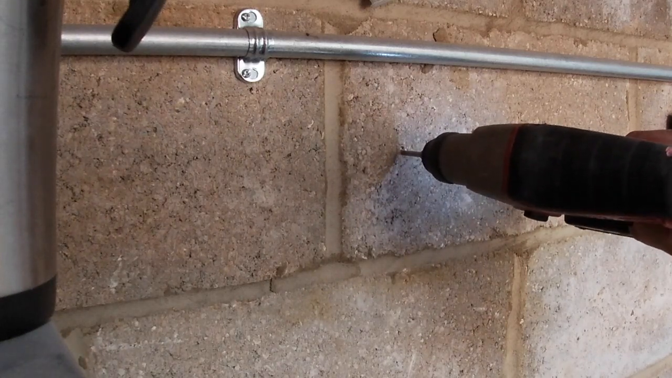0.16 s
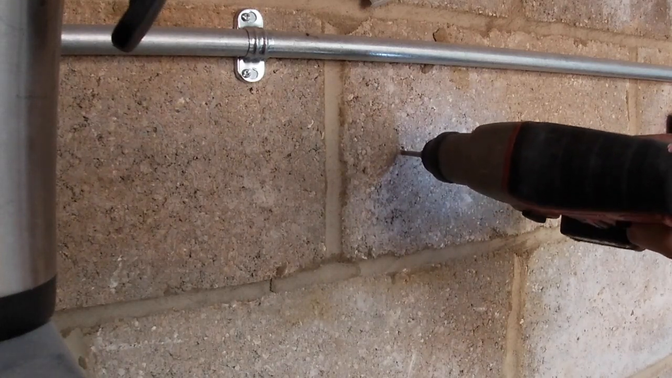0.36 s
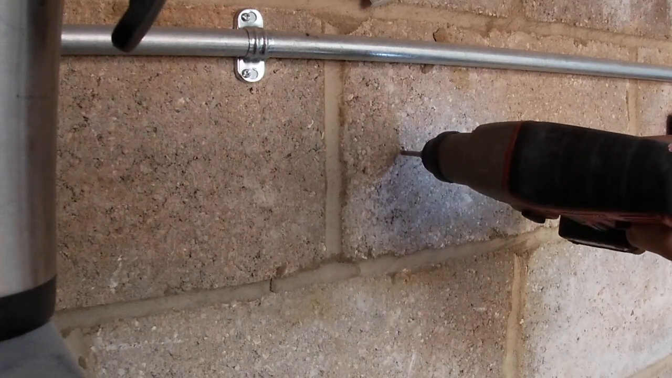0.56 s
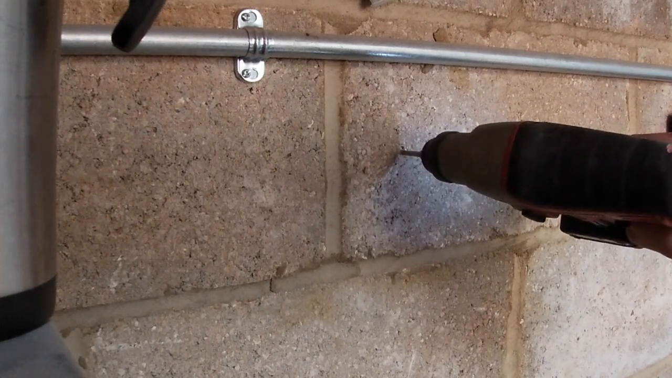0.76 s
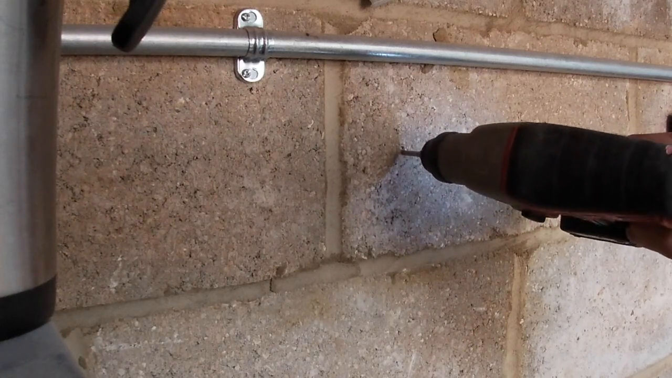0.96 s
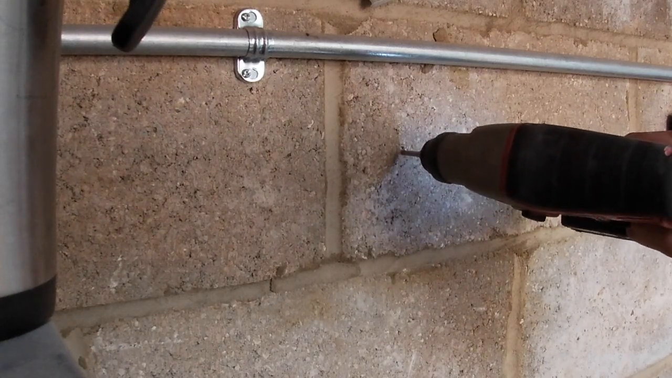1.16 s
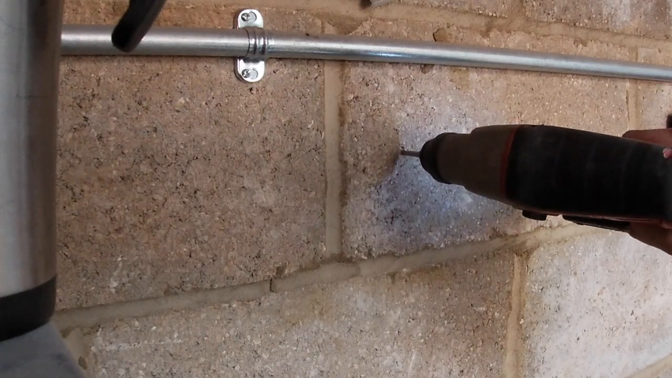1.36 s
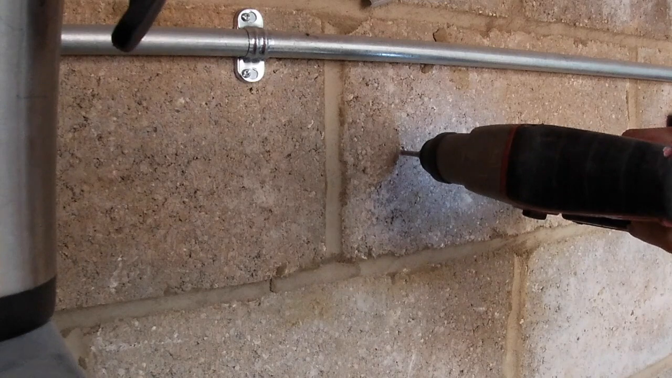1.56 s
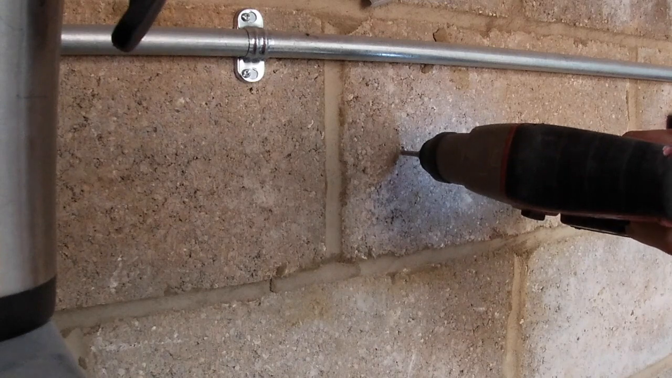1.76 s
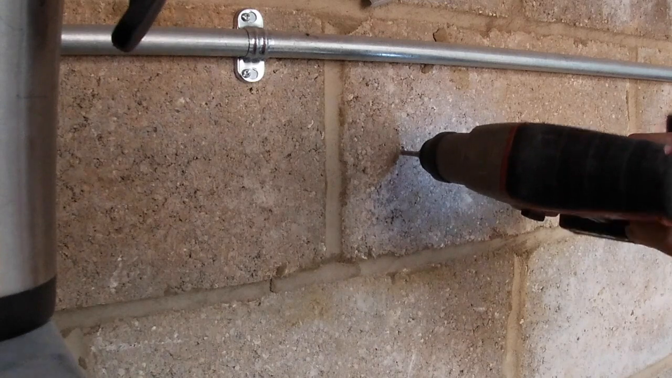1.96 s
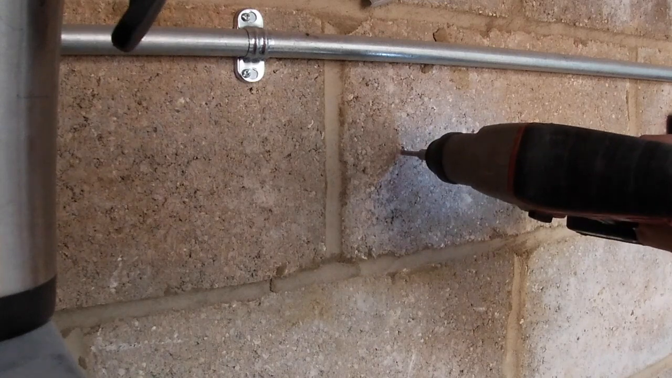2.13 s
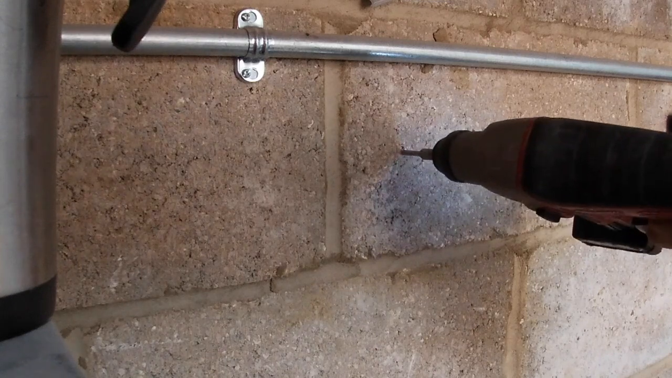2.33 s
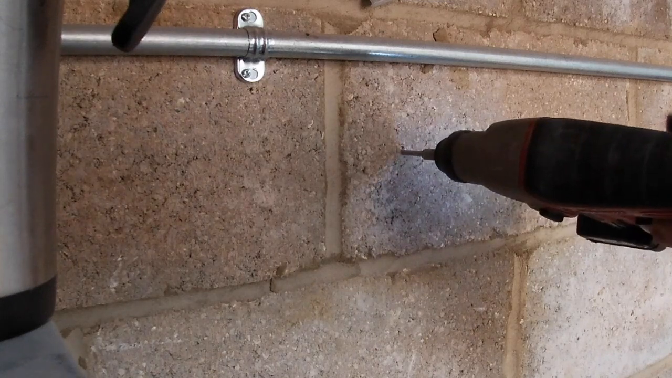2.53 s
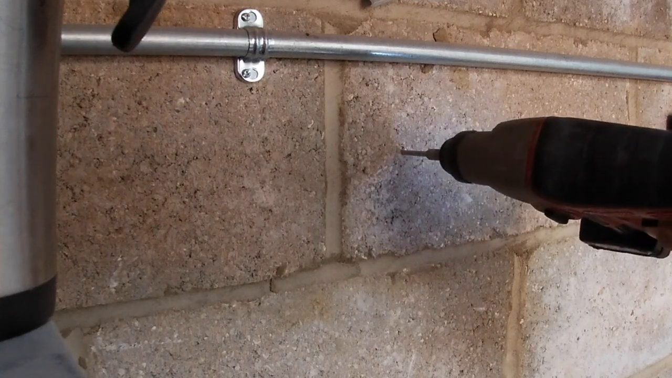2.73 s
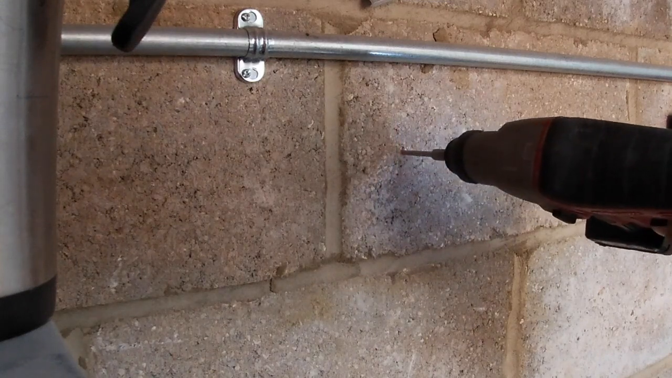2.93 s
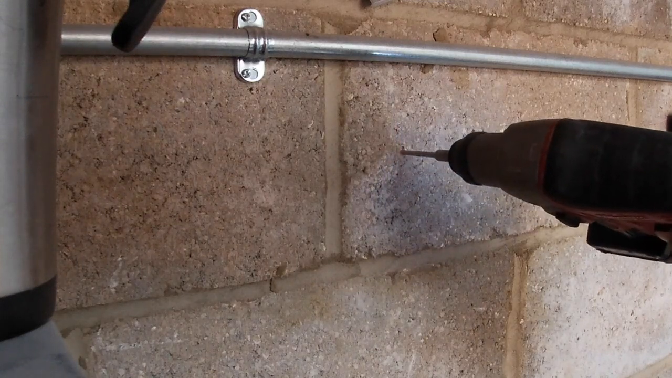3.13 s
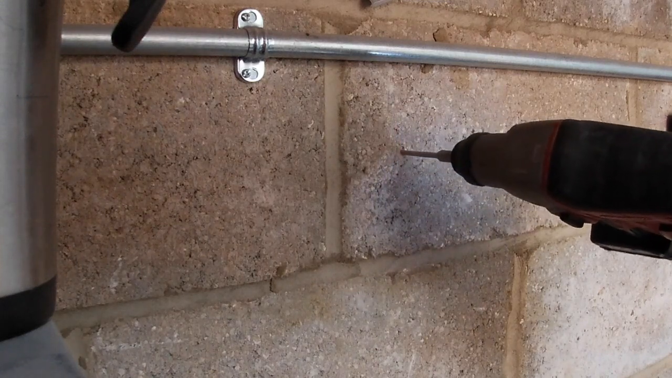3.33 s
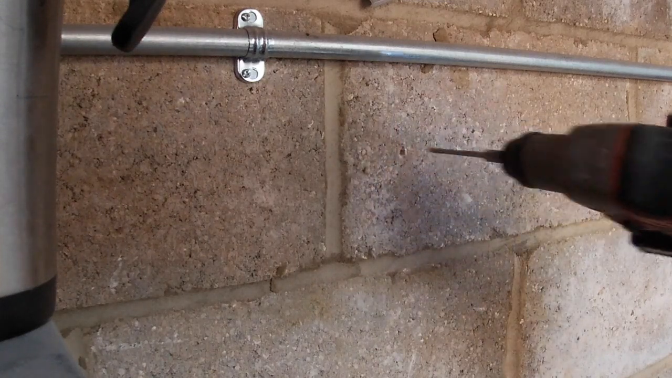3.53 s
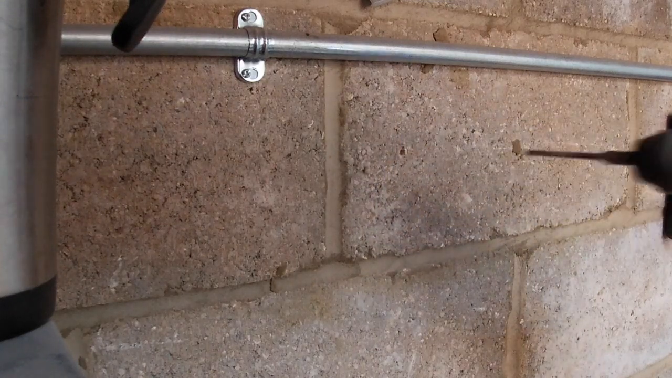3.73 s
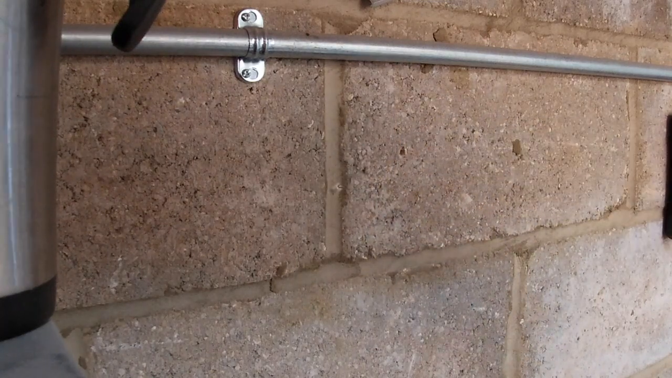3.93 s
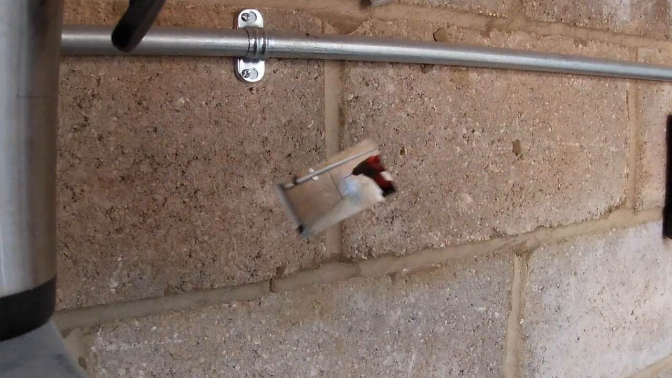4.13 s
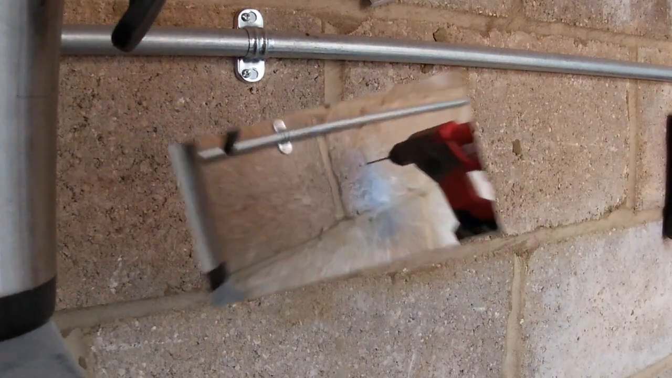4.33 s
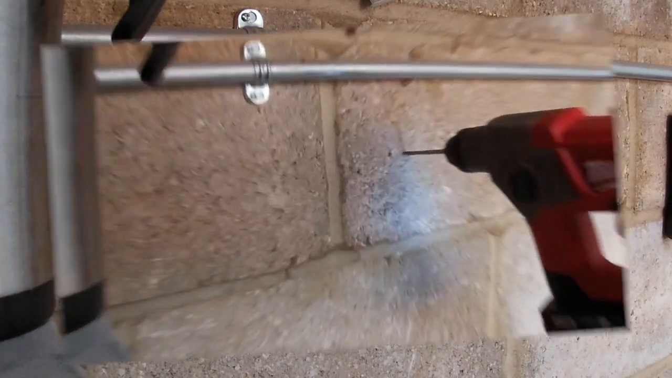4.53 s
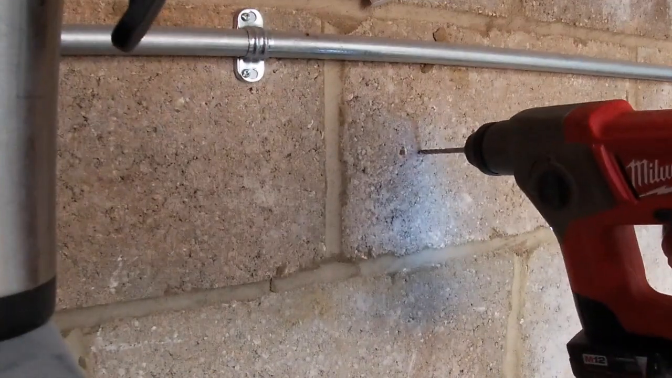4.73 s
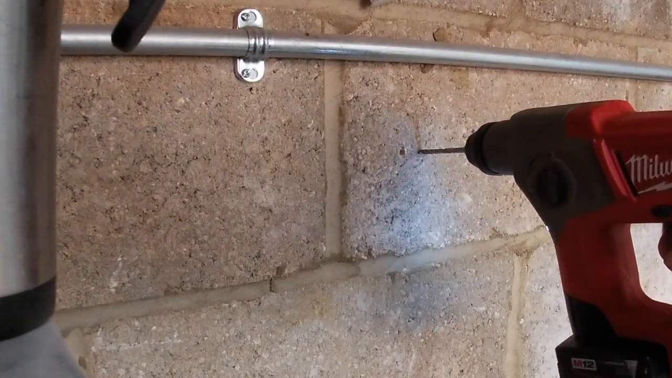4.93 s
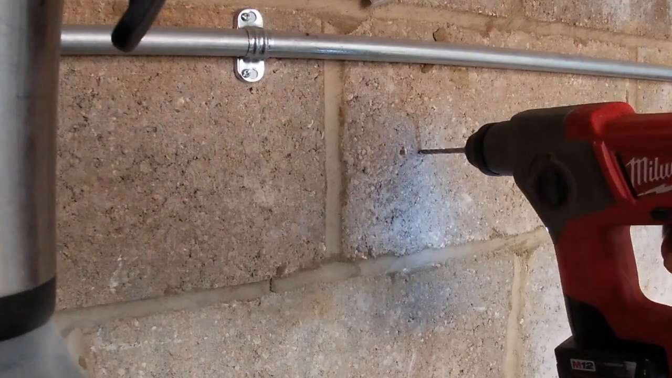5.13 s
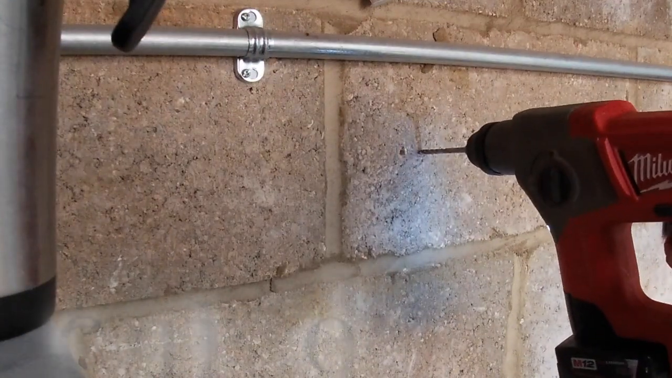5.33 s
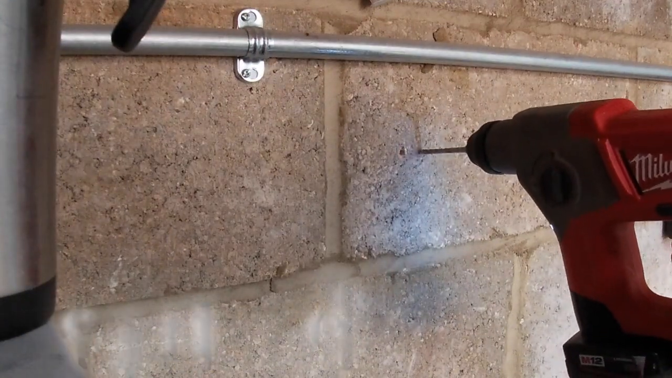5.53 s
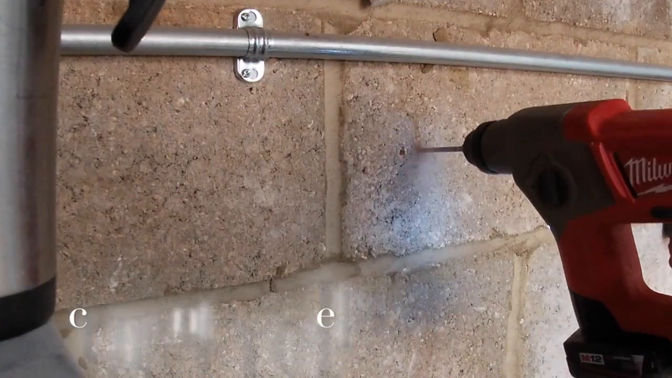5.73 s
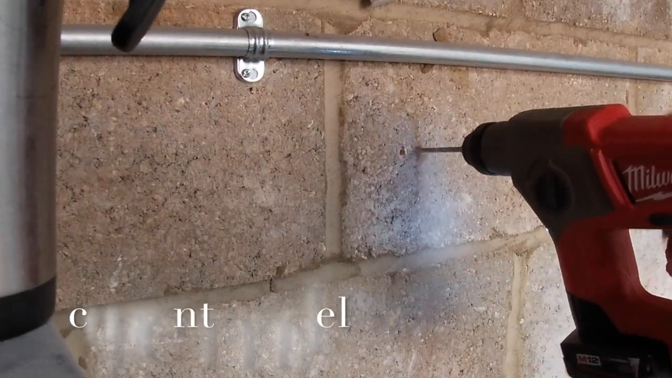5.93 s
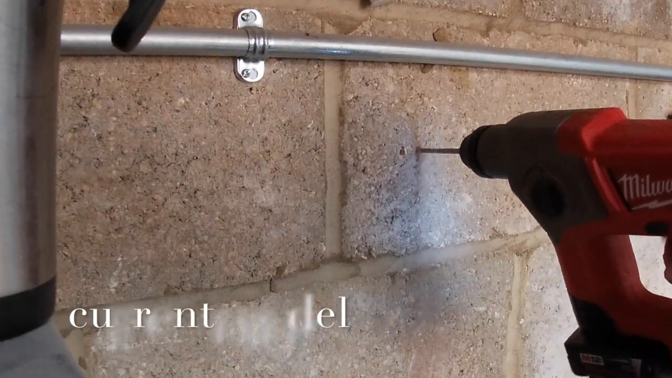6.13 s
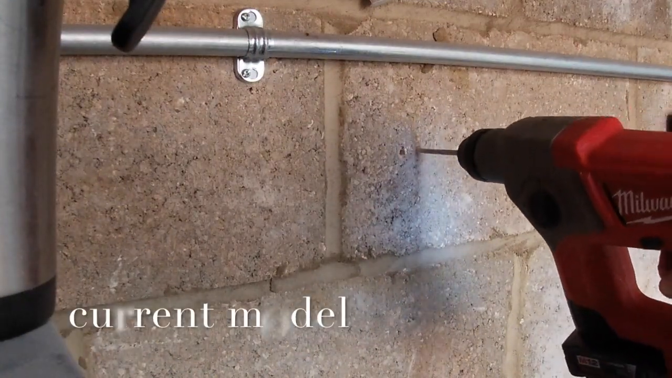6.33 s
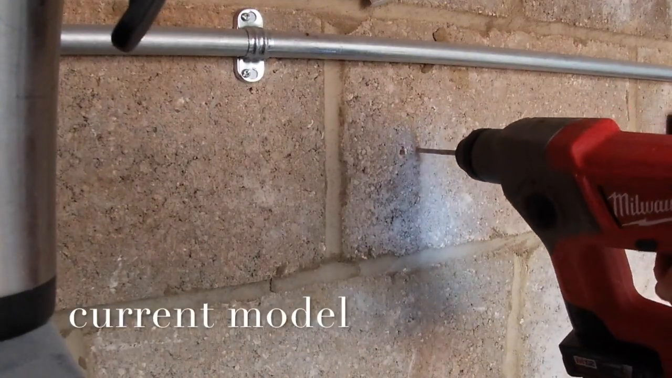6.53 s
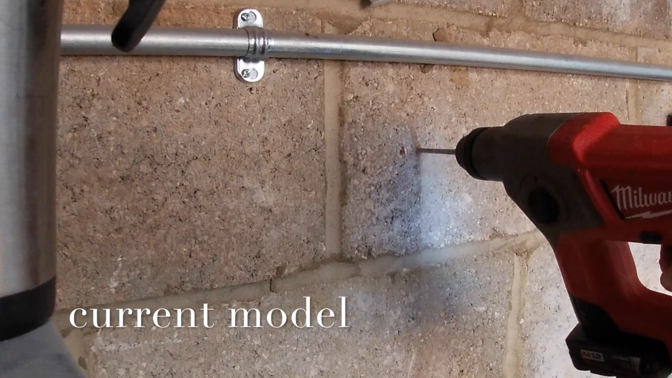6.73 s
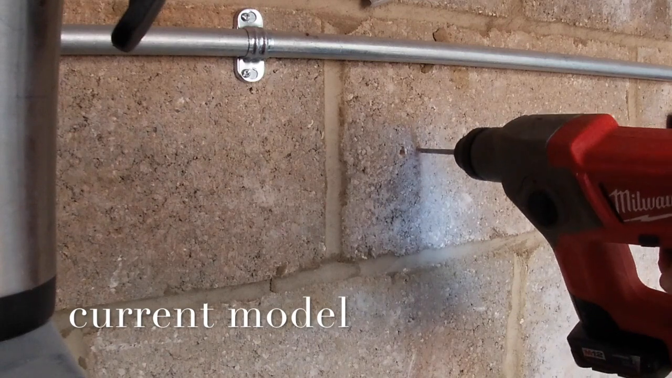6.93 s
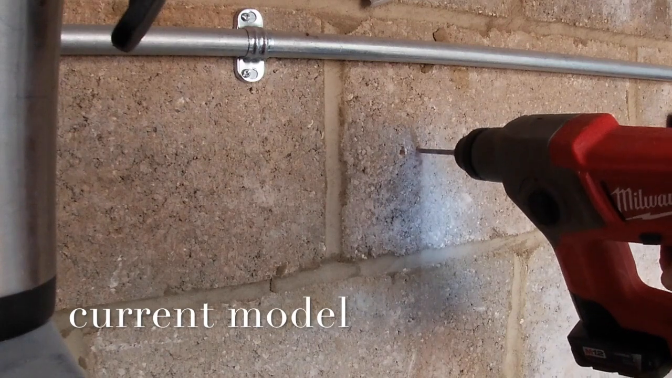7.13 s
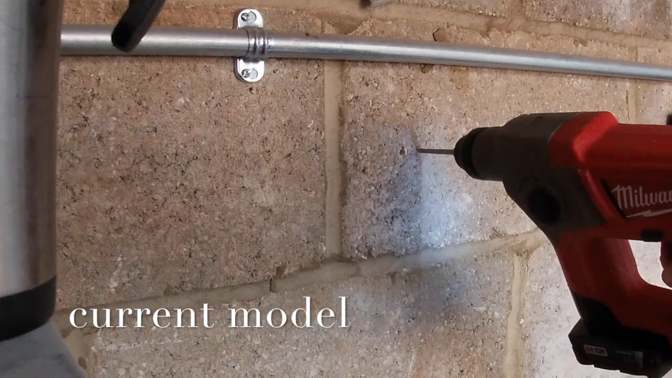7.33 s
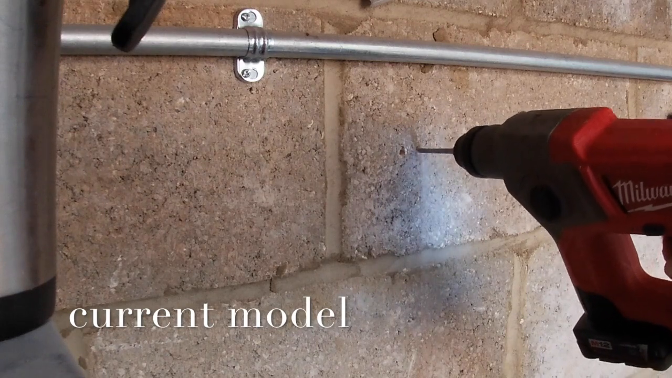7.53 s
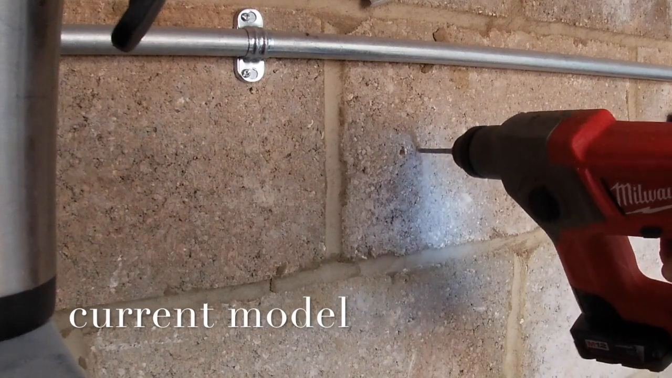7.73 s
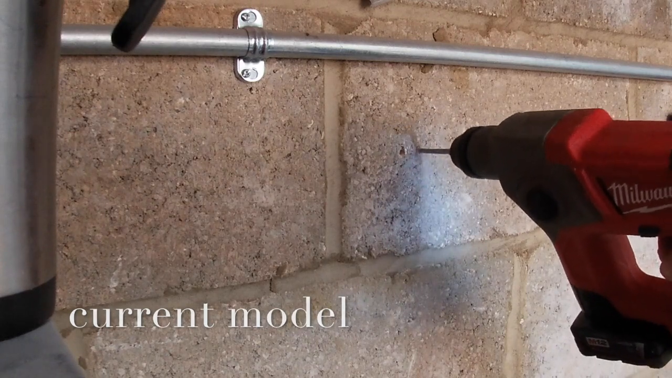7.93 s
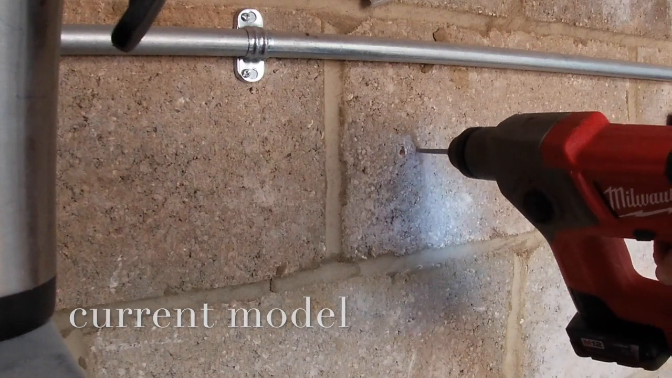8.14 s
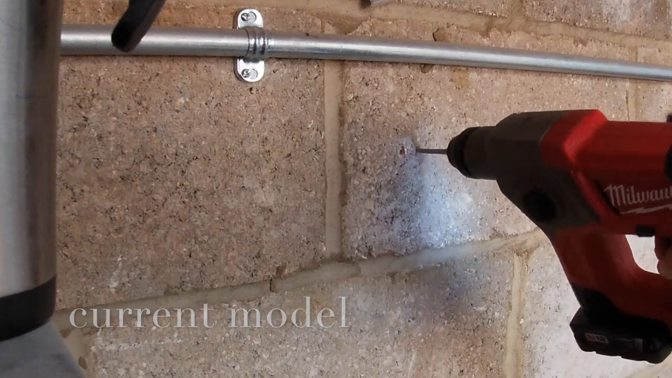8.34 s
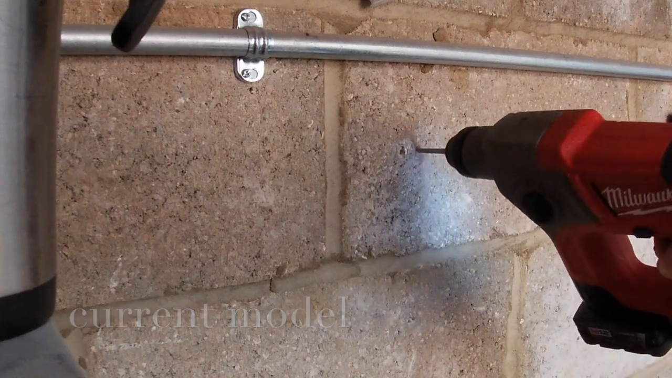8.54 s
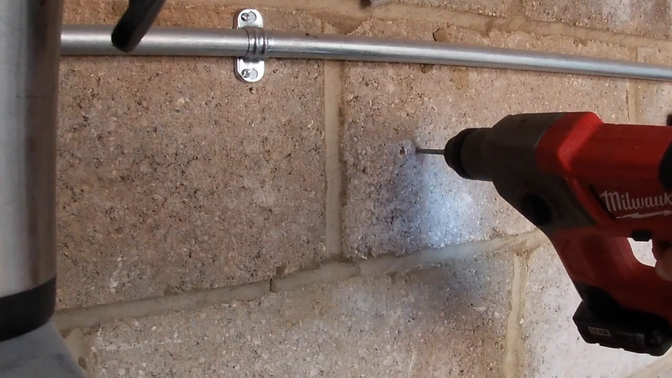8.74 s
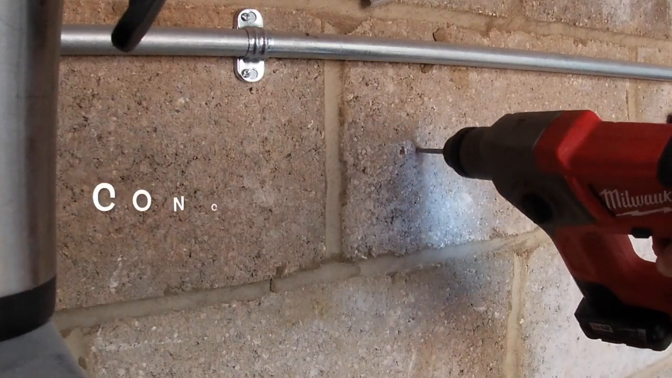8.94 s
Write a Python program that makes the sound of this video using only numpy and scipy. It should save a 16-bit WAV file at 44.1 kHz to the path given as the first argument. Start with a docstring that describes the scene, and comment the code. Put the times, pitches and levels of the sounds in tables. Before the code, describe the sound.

A hammer drill bores concrete with a harsh rapid rattle, pulls free whirring and winds down; after a short lull a second, faster drill hammers in.

```python
"""At a concrete block wall, close up: two cordless hammer drills bore in, one after the other.
The first hammers, runs free as it is pulled out of the hole and coasts to a halt.
The second chirps as its motor starts, spins up, hammers, labours briefly and hammers on.
A crank phase drives each drill's ringing blows, thud, shake and gear noise; narrow tones make
whine, song and squeals, and shaped noise makes knocks, bumps, rustle and room."""
import sys
import numpy as np
from scipy import signal
from scipy.fft import rfft, irfft
from scipy.io import wavfile

SR = 44100
rng = np.random.default_rng(int(sys.argv[2]) if len(sys.argv) > 2 else 0)


def to_wav(s):
    """Save 16-bit WAV."""
    ch = np.atleast_2d(s).T  # columns
    pcm = np.round(np.clip(ch, -1, 1) * 32767)  # PCM
    wavfile.write(sys.argv[1], SR, pcm.astype(np.int16))


N = 396018
T = np.arange(N) / SR  # s
HZ = np.fft.rfftfreq(N, 1 / SR)

# hammer crank while the first drill bores: (time [s], speed [turns/s])
BORING_SPEED_1 = [(0.0, 79.7), (1.03, 79.2), (1.44, 77.8), (1.89, 77.8), (2.08, 79.3)]
# hammer crank of the second drill at full trigger: (time [s], speed [turns/s])
FULL_SPEED_2 = [(5.85, 93.2), (6.27, 94.3), (6.41, 84.3), (6.5, 83.7), (6.71, 83.3), (6.8, 91.9),
                (7.44, 93.25), (8.3, 93.4), (8.38, 91.9), (8.98, 93.07)]
# low thud of each drill, one entry per multiple of crank speed from the second up: relative level [dB]
THUD_ORDERS_1 = [1.5, -1, 0.5, -13, -7.5, -10, -14, -8, -8, -8.5, -3.5, -4]
THUD_ORDERS_2 = [1.5, 0, -2, -8, -5, -7.5, -2, -12, -4.5, 0, -6]
# tone of each bit striking the block: (frequency [Hz], relative density [dB per Hz])
STRIKE_COLOUR_1 = [(350, -27), (900, -11.5), (1500, -4.5), (2000, -7), (3300, -7.5), (3900, -11.5),
                   (7500, -11.5), (9600, -15), (12000, -35), (15000, -41.5)]
STRIKE_COLOUR_2 = [(350, -12.5), (700, -6), (2400, -3), (3900, -7.5), (7400, -8.5), (9600, -17.5),
                   (11500, -30.5), (15000, -38.5)]
# tone of the gears alone: (frequency [Hz], relative density [dB per Hz])
GEAR_COLOUR = [(90, -16), (180, -10), (350, -17), (600, -15.5), (750, -4), (900, -7.5), (1300, -2),
               (2000, -4), (5000, -9.5), (9500, -13.5), (12000, -33), (15000, -42)]
# resonances of bit, chuck and housing: (frequency [Hz], width [Hz], lift [dB])
STEEL_MODES_1 = [(1570, 460, 2.5), (2314, 105, 7.5), (3035, 120, 4.5), (3470, 130, 5), (4134, 53, 7.5),
                 (7560, 120, 5)]
STEEL_MODES_2 = [(1306, 63, 4), (1480, 24, 5.5), (1627, 63, -7), (2660, 160, 1.5), (3360, 180, 3.5),
                 (4990, 130, 4.5), (6880, 230, 5)]
# whine of the first motor and its gear teeth: (multiple of crank speed, relative level [dB])
WHINE_ORDERS = [(14.5, -12.5), (18.4, -16.5), (69, -16), (110.5, -16), (166, -40)]
# hum of the gears running free, before the effort scaling: (multiple of crank speed, level [dB])
HUM_ORDERS = [(6, -47.5), (8, -38), (9, -35.5), (11, -37)]
# shaking housing of the first drill, before drift and effort: (time [s], level [dB])
SHAKE_LEVEL_1 = [(0.0, -39), (0.24, -31.5), (1.13, -38), (1.5, -27), (2.01, -29), (2.09, -43),
                 (2.62, -23.5), (3.02, -21), (3.45, -25.5), (3.62, -37.5)]
# second trigger, squeezed in steps, and the motor's song at each:
# (time [s], relative speed, pitch [Hz], level [dB])
TRIGGER_STEPS = [(5.323, .13, 3820, -44), (5.467, .34, 3610, -36), (5.59, 0.97, 3470, -24.5)]
# whistle of the speed control, before its lift with the trigger: (frequency [Hz], level [dB])
SWITCHING_TONES = [(9846, -49), (14150, -67)]
# knocks of slack gears, chuck and handling: (time [s], relative level [dB])
KNOCK_HITS = [(4.045, -15.5), (4.117, -18), (4.146, -21), (4.167, -25.5), (4.2, -25.5), (4.886, -35),
              (5.326, -22.5), (5.5039, -11), (5.5488, -22), (5.609, -16)]
# dull bumps: (time [s], level [dB], t60 [s])
BUMP_HITS = [(4.891, -26, .45), (5.08, -48, 0.32), (5.18, -40, 0.48), (5.68, -16, 0.91)]
# thin falling squeals as the first motor brakes and dies:
# (time [s], length [s], first pitch [Hz], last pitch [Hz], level [dB])
SQUEAL_SWEEPS = [(3.93, .12, 5170, 4150, -33), (4.271, 0.16, 6400, 6000, -51),
                 (4.42, 0.13, 6100, 5800, -54)]
# soft rustles of handling, before the scraping flutter: (time [s], length [s], level [dB])
RUSTLE_SWELLS = [(4.097, 0.47, -58), (4.685, .055, -53), (4.752, 0.1, -52.5), (4.84, .55, -58.5)]
# tone of the rustle: (frequency [Hz], relative density [dB per Hz])
RUSTLE_TONE = [(300, -13), (900, -15), (4300, -15.5), (5000, -9.5), (5700, -19), (7500, -13.5),
               (14000, -43.5)]
# tone of the room rumble: (frequency [Hz], relative density [dB per Hz])
ROOM_COLOUR = [(30, -7), (220, -4), (300, -26), (1000, -30), (2200, -58)]

# first drill: the bit leaves the bottom of the hole, then the trigger is let go and the crank coasts
PULL_OUT_S, PULL_OUT_TAKES_S = 2.076, 0.18
LET_GO_S, COAST_S, COAST_POWER = 3.746, .58, 1.25
# the freed crank turns faster, then slowly sags (turns/s, turns/s lost each second)
FREE_SPEED, FREE_SAG_PER_S = 87.8, 1.1
PING_SWELL_S = .5  # from here the bit's ping swells, then eases back by the pull-out
# second drill: the motor chirps, and the hammer engages as the bit meets the wall
CHIRP_S, CHIRP_LENGTH_S, CHIRP_HZ, CHIRP_DB = 5.3228, 0.0048, 3770, -12.5
SPIN_UP_LAG_S = .05
BITE_S, BITE_TAKES_S = 5.67, 0.047
BOOM_DB, BOOM_T60 = -19.5, 1.7
# loudness grows as a power of crank speed, up to this speed (turns/s)
LOUD_SPEED, LOUDNESS_POWER = 81.7, 1.61
ROOM_DB = -58
EDGE_HZ = 15400


def first_drill(whine_width_hz=110, whine_db=-25, free_whine_db=6.5, coasting_whine_db=-3,
                ping_db=-25, ping_swell_db=5.5):
    """Hammers, runs free and coasts down; its whine swells while the motor drives the freed bit."""
    bite = 1 - ramp(PULL_OUT_S, PULL_OUT_TAKES_S)
    free_speed = FREE_SPEED - FREE_SAG_PER_S * (T - PULL_OUT_S)
    coasting = (1 - ramp(LET_GO_S, COAST_S)) ** COAST_POWER
    speed = (bite * follow(BORING_SPEED_1) + (1 - bite) * free_speed) * coasting
    ping_swell = arch(PING_SWELL_S, PULL_OUT_S - PING_SWELL_S)
    body = drill(speed, bite, THUD_ORDERS_1, STRIKE_COLOUR_1, STEEL_MODES_1,
                 strike_db=-19.0, gears_db=-18.7, thud_db=-30.5,
                 shake_db=follow(SHAKE_LEVEL_1), second_db=-15.5,
                 ping_hz=1563, ping_t60=0.019, ping_db=ping_db + ping_swell_db * ping_swell,
                 crack_t60=0.0035, tail_db=-3.5, tail_t60=0.11,
                 ring_hz=3400, grit_db=-2, uneven_db=0.8)
    motor = speed * (1 + .007 * drift(60))
    whine = sum(amp(db) * fuzzy_tone(order * motor, whine_width_hz) for order, db in WHINE_ORDERS)
    free_swell = np.sqrt(arch(PULL_OUT_S, LET_GO_S - PULL_OUT_S))
    whine_level_db = whine_db + free_whine_db * free_swell + coasting_whine_db * (T > LET_GO_S)
    return body + effort(speed) * amp(whine_level_db) * whine


def second_drill(thud_db=-28.0, labour_thud_db=-4, shake_db=-30.5, labour_shake_db=15.0,
                 shake_lag_s=0.12, groan_db=-23, groan_lag_s=0.04, boom_width_hz=18):
    """Spins up and hammers faster as the wall booms; labouring softens the thud and shakes the housing."""
    full_speed = follow(FULL_SPEED_2)
    share, _, _ = trigger()
    speed = full_speed * lagged(share, SPIN_UP_LAG_S)
    labour = (full_speed.max() - full_speed) / np.ptp(full_speed)  # 0 at top speed, 1 at the deepest sag
    bite = ramp(BITE_S, BITE_TAKES_S)
    body = drill(speed, bite, THUD_ORDERS_2, STRIKE_COLOUR_2, STEEL_MODES_2,
                 strike_db=-20.0, gears_db=-17.8, thud_db=thud_db + labour_thud_db * labour,
                 shake_db=shake_db + labour_shake_db * lagged(labour, shake_lag_s) ** 2, second_db=-12.5,
                 ping_hz=2680, ping_t60=0.011, ping_db=-18 - 6.2 * labour,
                 crack_t60=0.0074, tail_db=2.5, tail_t60=0.11,
                 ring_hz=4760, grit_db=-4, uneven_db=1.1)
    boom = amp(BOOM_DB) * bite * dying(T - BITE_S, BOOM_T60) * fuzzy_tone(2 * speed, boom_width_hz)
    # a low groan swells on the way into the labouring and again on the way out
    slipping = np.sin(np.pi * lagged(labour, groan_lag_s) ** 2) ** 2
    groan_tone = np.sin(3 * 2 * np.pi * np.cumsum(speed) / SR)
    groan = amp(groan_db) * bite * slipping * groan_tone
    return body + boom + groan


def drill(speed, bite, thud_orders, strike_colour, steel_modes, strike_db, gears_db, thud_db,
          shake_db, second_db, ping_hz, ping_t60, ping_db, **blow):
    """One crank drives blows, thud, ping, gears and shake; bite (0-1) trades gear noise for blows."""
    speed = np.maximum(speed, .1)
    turns = np.cumsum(speed * (1 + .0018 * drift(15))) / SR
    struck = amp(strike_db) * colour(hammer(turns, speed, **blow), strike_colour, steel_modes)
    struck += amp(thud_db) * thud(turns, thud_orders)
    since_blow = turns % 1 / speed  # s
    ping = amp(ping_db + 2 * drift(30)) * dying(since_blow, ping_t60)
    ping *= np.sin(2 * np.pi * ping_hz * since_blow)
    whirring = amp(gears_db) * colour(gears(turns, speed), GEAR_COLOUR, steel_modes)
    hum = sum(amp(db) * (1 + .5 * drift(8.9)) * np.sin(2 * np.pi * order * turns)
              for order, db in HUM_ORDERS)
    shake = np.sin(2 * np.pi * turns)
    shake += amp(second_db) * (1 + .5 * drift(34)) * np.sin(4 * np.pi * turns)
    shake *= np.sqrt(2) * amp(shake_db + drift(16))
    loud = effort(speed)
    boring = np.sqrt(bite) * (struck + ping)
    running_free = np.sqrt(1 - bite) * (whirring + loud * hum)
    return loud * (boring + running_free + loud ** 2 * shake)


def hammer(turns, speed, crack_t60, tail_db, tail_t60, ring_hz, grit_db, uneven_db,
           jitter_s=.00002, lowest_ring_hz=1100):
    """Each blow rings the steel the same way, and crushes concrete differently every time."""
    t = np.arange(4096) / SR
    shape = dying(t, crack_t60) + amp(tail_db) * dying(t, tail_t60)  # the crack, then the ringing
    shape /= np.linalg.norm(shape)
    clicks = blows(turns, jitter_s, uneven_db) * np.sqrt(SR / speed)  # even power at any speed
    modes = rfft(shape * rng.standard_normal(len(t)))
    response = irfft(modes / abs(modes) ** (3 / 4))  # many modes of nearly equal strength
    ring = signal.oaconvolve(clicks, response / np.linalg.norm(response))[:N]
    grit_power = abs(signal.oaconvolve(clicks ** 2, shape ** 2)[:N])
    grit = noise() * np.sqrt(grit_power)
    alike = 1 / (1 + amp(2 * grit_db) + (HZ / ring_hz) ** 2)  # ringing rules the middle, grit the treble
    ring_part = rfft(ring) * np.sqrt(alike) * (HZ > lowest_ring_hz)
    return irfft(ring_part + rfft(grit) * np.sqrt(1 - alike), N)


def blows(turns, jitter_s, uneven_db):
    """One click a crank turn, each a little early or late, strong or weak."""
    at = np.flatnonzero(np.diff(np.floor(turns)) > 0)
    late, size = rng.standard_normal((len(at), 2)).T
    landing = at + np.round(late * jitter_s * SR).astype(int)
    clicks = np.zeros(N)
    clicks[np.clip(landing, 0, N - 1)] = amp(uneven_db * size)
    return clicks


def thud(turns, orders_db, waver=.22):
    """The low push of the blows on wall and housing: wavering multiples of the crank speed."""
    tones = []
    for order, db in enumerate(orders_db, 2):
        tone = np.cos(2 * np.pi * (order * turns + rng.random()))
        tones.append(amp(db) * (1 + waver * drift(46.0)) * tone)
    return sum(tones) / np.std(sum(tones[1:5]))  # third to sixth multiples set the level


def gears(turns, speed, rattle=0.059, slack_hz=45, grain_db=1.1):
    """Teeth hiss, and rattle twice a turn; the slower they turn, the more the knocks stand apart."""
    depth = np.clip(rattle + (slack_hz / (speed + slack_hz)) ** 2, 0, .9)
    knock = evened(np.exp(-4 * (2 * turns % 1)))
    return noise() * (1 - depth + depth * knock) * amp(grain_db * drift(300))


def effort(speed):
    """Loudness of a drill at a given crank speed, 0-1."""
    return np.minimum(speed / LOUD_SPEED, 1) ** LOUDNESS_POWER


def trigger():
    """Share of full speed, sung pitch and sung level, held from step to step."""
    s, share, hz, db = np.transpose(TRIGGER_STEPS)
    step = np.searchsorted(s[1:], T)
    return share[step] / share[-1] * (T > s[0]), hz[step], db[step]


def motor_start(width_hz=220, edge_s=0.00085, ring_db=-28, ring_t60=0.14, whistle_rise_db=4):
    """A clean chirp as the current comes on, a rougher song once the rotor moves, under a thin whistle."""
    share, hz, db = trigger()
    chirp_end = CHIRP_S + CHIRP_LENGTH_S
    chirp_gate = ramp(CHIRP_S, edge_s) - ramp(chirp_end, edge_s)
    chirp = amp(CHIRP_DB) * chirp_gate * np.sqrt(2) * np.sin(2 * np.pi * CHIRP_HZ * T)
    song_level = amp(db) + amp(ring_db) * dying(T - chirp_end, ring_t60)
    song = song_level * fuzzy_tone(hz, width_hz)
    whistle = sum(amp(tone_db) * np.sqrt(2) * np.sin(2 * np.pi * tone_hz * T + .6 * drift(30))
                  for tone_hz, tone_db in SWITCHING_TONES)
    starting = ramp(chirp_end, edge_s) - ramp(BITE_S, BITE_TAKES_S)
    return chirp + starting * (song + amp(whistle_rise_db * share) * whistle)


def knocks(level_db=-9, t60=0.044, tail_db=-16, tail_t60=0.31):
    """Short metallic knocks: dying noise in the gears' tone, with a little room behind it."""
    shape = sum(amp(db) * (dying(T - s, t60) + amp(tail_db) * dying(T - s, tail_t60))
                for s, db in KNOCK_HITS)
    return amp(level_db) * colour(noise() * shape, GEAR_COLOUR)


def bumps(rise_s=0.018):
    """Dull low booms of soft-edged noise, the last as the second bit first bites the wall."""
    shape = sum(amp(db) * dying(T - s, t60) * ramp(s, rise_s) for s, db, t60 in BUMP_HITS)
    # (frequency [Hz], relative density [dB per Hz])
    dull = [(30, -16), (130, -3.5), (220, -8.5), (350, -25.0), (800, -33), (4000, -63)]
    return colour(noise() * shape, dull)


def squeals(width_hz=200):
    """Narrow tones gliding down as the first motor brakes and dies, each swelling and fading."""
    return sum(amp(db) * arch(s, length) * fuzzy_tone(first + (last - first) * ramp(s, length), width_hz)
               for s, length, first, last, db in SQUEAL_SWEEPS)


def rustle(scrape_db=1.5, hiss_db=-64):
    """Handling: fluttering noise swells over a faint hiss."""
    handling_power = sum(amp(2 * db) * arch(s, length) for s, length, db in RUSTLE_SWELLS)
    level = np.sqrt(amp(2 * hiss_db) + handling_power)
    return level * amp(scrape_db * drift(90)) * colour(noise(), RUSTLE_TONE)


def room():
    """Steady low rumble of the room."""
    return amp(ROOM_DB) * colour(noise(), ROOM_COLOUR)


def amp(db):
    """Decibels to gain."""
    return 10 ** (np.asarray(db) / 20)


def evened(x):
    """Scales to unit RMS."""
    return x / np.sqrt(np.mean(x ** 2) + 1e-20)


def follow(rows):
    """Straight-line automation through (time [s], value) points."""
    return np.interp(T, *np.transpose(rows))


def ramp(start_s, length_s):
    """Rises from 0 to 1, then holds."""
    return np.clip((T - start_s) / length_s, 0, 1)


def arch(start_s, length_s):
    """Swells from 0 to 1 and back."""
    return np.sin(np.pi * ramp(start_s, length_s))


def dying(t, t60):
    """Exponential decay from t = 0, falling 60 dB in t60 seconds."""
    return amp(-60 * np.maximum(t, 0) / t60) * (t >= 0)


def lagged(x, lag_s):
    """Follows a control with inertia."""
    keep = np.exp(-1 / (lag_s * SR))
    return signal.lfilter([1 - keep], [1, -keep], x)


def noise():
    """White noise."""
    return rng.standard_normal(N)


def drift(hz):
    """Random wander of unit RMS, mostly below the given rate."""
    return evened(irfft(rfft(noise()) / (1 + (HZ / hz) ** 4), N))


def fuzzy_tone(hz, width_hz):
    """A tone smeared over a narrow band."""
    turn = np.exp(2j * np.pi * np.cumsum(hz) / SR)
    return (turn * (drift(width_hz) + 1j * drift(width_hz))).real


def colour(x, spectrum, resonances=()):
    """Causal minimum-phase filter: a smooth spectrum with resonances on it, at unit RMS gain."""
    f, db = np.transpose(spectrum)
    db = np.interp(np.log(HZ + 1), np.log(f + 1), db)
    for hz, width, lift_db in resonances:
        db = db + lift_db / (1 + (2 * (HZ - hz) / width) ** 2)
    log_gain = np.log(evened(amp(db)))
    mirrored = np.r_[log_gain, log_gain[-2:0:-1]]
    phase = -signal.hilbert(mirrored).imag[:len(HZ)]
    return irfft(rfft(x) * np.exp(log_gain + 1j * phase), N)


def scene():
    """Both drills, the motor start, the incidental hits and the background, in mono."""
    drills = first_drill() + second_drill() + motor_start()
    hits = knocks() + bumps()
    background = room() + rustle() + squeals()
    return (drills + hits + background)[None]


def record(dry, dip_hz=8280, dip_width_hz=450, dip_db=-6):
    """The microphone's narrow dip in the treble, then the band limit."""
    dip = amp(dip_db / (1 + (2 * (HZ - dip_hz) / dip_width_hz) ** 2))
    heard = irfft(rfft(dry) * dip, N)
    band_limit = signal.firwin(511, EDGE_HZ, window=("kaiser", 9), fs=SR)
    return signal.oaconvolve(heard, band_limit[None], "same")


dry = scene()
out = record(dry)
to_wav(out)
```